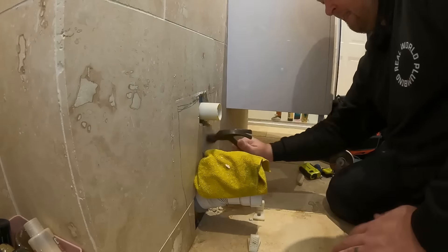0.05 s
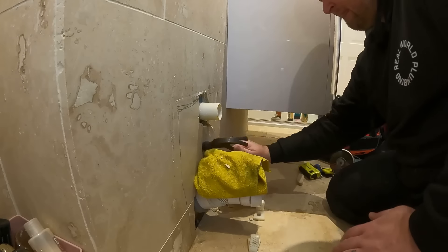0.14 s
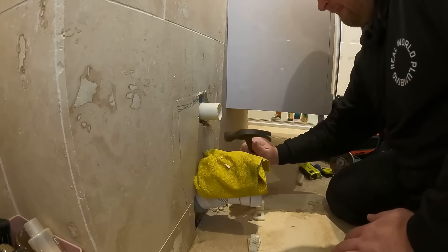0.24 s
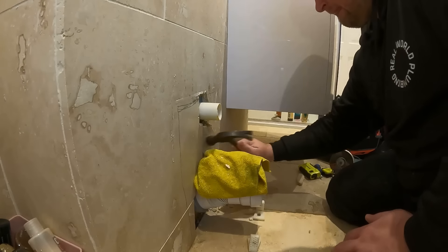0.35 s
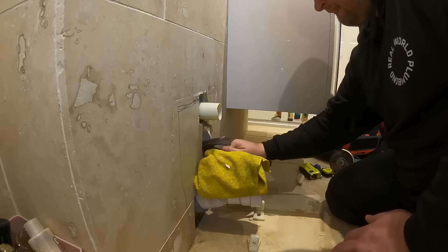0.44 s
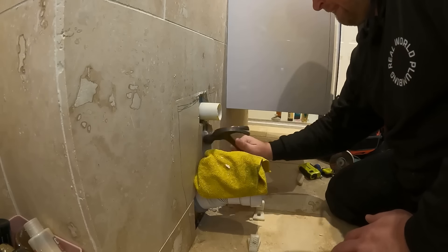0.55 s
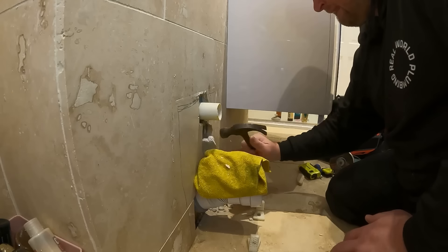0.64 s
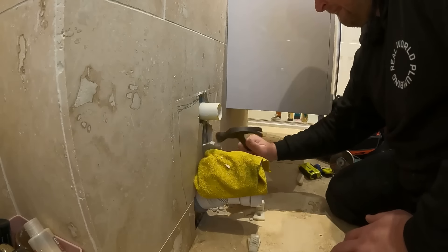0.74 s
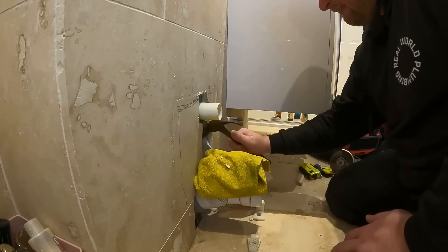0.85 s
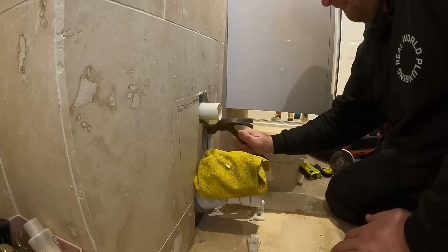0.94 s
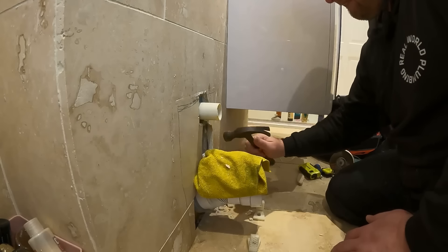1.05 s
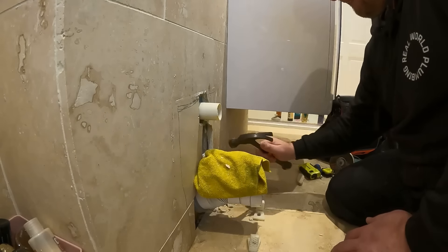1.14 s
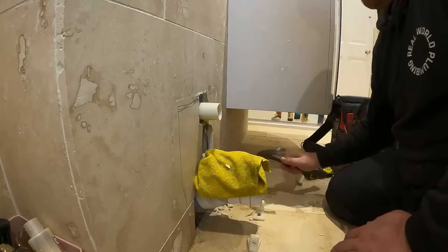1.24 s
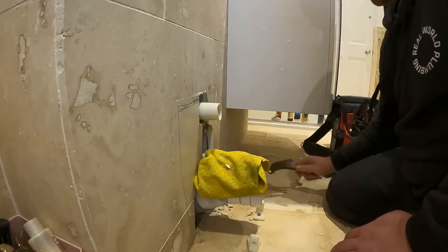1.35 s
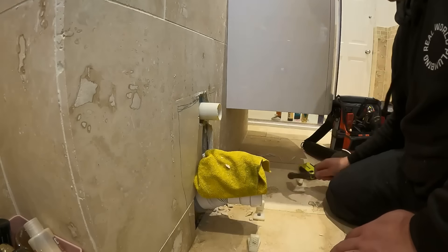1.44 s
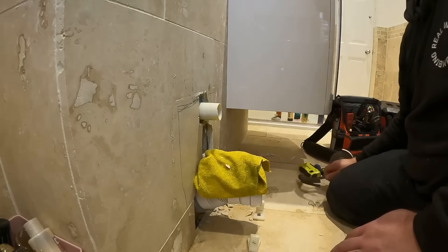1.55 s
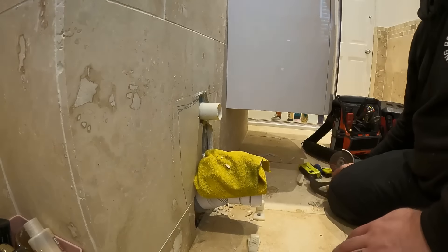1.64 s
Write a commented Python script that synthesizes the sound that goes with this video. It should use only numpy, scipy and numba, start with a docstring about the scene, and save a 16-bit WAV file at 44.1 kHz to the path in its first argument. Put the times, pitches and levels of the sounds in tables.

```python
"""A hammer knocks ceramic tiles off a bathroom wall, close to a small camera on the floor.
The ring of an earlier blow is still dying; light knocks lead into the hardest blow, and a second hard one follows.
Each blow is a run of snaps that rings the tile, with a slower boom of the wall. Weaker blows come next, while
shards tick and dull low knocks land as short pitched noises; then a piece skips and scrapes, as dense clicks.
The room answers with fading noise over a quiet background, and the camera's limiter ducks the loud blows."""
import sys
import numpy as np
from scipy import signal
from scipy.fft import rfft, irfft, next_fast_len
from scipy.io import wavfile
from scipy.ndimage import uniform_filter1d
from numba import njit

SR = 44100
rng = np.random.default_rng(int(sys.argv[2]) if len(sys.argv) > 2 else 0)


def waveform_to_disk(signal):
    """Save audio, clipped to [-1, 1], as 16-bit WAV at the path in sys.argv[1]."""
    frames = np.transpose(np.atleast_2d(signal))
    scaled = np.clip(frames, -1, 1) * 32767
    samples = np.round(scaled).astype(np.int16)
    wavfile.write(sys.argv[1], SR, samples)


def rack_gain(trim_db):
    """Turn a fader trim in dB into the linear factor to multiply a signal by."""
    fader = np.asarray(trim_db, float)
    return 10 ** (fader / 20)


N = 74970
LEAD = SR // 2  # spare samples before the start, so an earlier blow can ring on
M = next_fast_len(N + 2 * LEAD)

# All levels in these tables are relative, ahead of the microphone and limiter.
# hammer blows: start_s, crack_level_db, snapping_ms, tilt_db_per_octave, contact_top_hz, tile_pitch_ratio, thud_level_db
BLOWS = [(-.3, 10, 4, -3.5, 7000, 1.01, -10.5), (0.1853, 1, 4.2, -6.5, 2200, .99, -41),
         (0.1912, -1, 9.4, -2, 4050, 0.94, -17), (0.2094, -1.5, 10, 3, 4040, 2.76, -18),
         (0.2191, 32, 3.5, 1.05, 14000, 1.001, 7), (0.5094, 27.5, 3.1, 0.72, 12000, 1.127, -7),
         (.905, 6, 6.7, -4, 7000, 1.03, -21.5), (.99, -3, 14, -2, 3200, .9, -31),
         (1.0655, 13, 3.6, -3, 7500, 0.846, -17.5)]
# ringing tones of a tile, before the blow's pitch ratio: pitch_hz, level_db, fade_by_60_db_s
TILE_TONES = [(940, -2.5, 0.033), (1295, 6, 0.023), (1933, 5.5, 0.011), (2200, -8, 0.026),
              (2833, -0.5, 0.028), (3252, 1, 0.017), (3500, -36, 0.012), (4880, 2.5, .015),
              (5090, -4, 0.033), (5400, -29, 0.015), (6730, -16, .012), (7900, -23, .008),
              (10700, -37, .012), (12800, -18, .005)]
# broad sound of cracking, before the blow's pitch ratio: frequency_hz, level_db
CRACK_COLOUR = [(35, 12), (60, -3.5), (623, 0.5), (1120, 3.5), (1660, 4.5), (3210, 5.5), (4340, -5.5),
                (5000, 0), (7440, -21), (16100, -61.5)]
# booming tones of the wall and room: pitch_hz, level_db, fade_by_60_db_s
WALL_TONES = [(69, -15, 0.58), (101.05, -14.5, 0.53), (118.5, -12, 0.49), (146.44, -3.5, 0.42),
              (166, -10, 0.47), (231.3, -6.5, 0.38), (264, -11.5, 0.17), (322.5, -17.5, .3)]
# shards and dull low knocks: start_s, level_db, pitch_hz, nominal_length_s, fall_above_pitch_db_per_octave
SHARDS_AND_KNOCKS = [(.4145, -36, 9000, .03, 12), (.4368, -6, 2900, .02, 9), (.838, -40, 8000, .02, 8),
                     (.9655, -37, 3000, .015, 14),           (1.033, -29, 3000, .022, 11),
                     (1.1045, -28, 3200, .025, 18), (1.2706, -32, 3200, .02, 5),
                     (1.283, -38, 6500, .025, 5), (1.3415, -33, 2800, .025, 16), (1.388, -33, 500, .07, 24),
                     (1.4946, -36, 3500, .02, 7), (1.5105, -44, 7000, .015, 14), (1.533, -40, 500, .07, 24)]
# skips that start the scrape: start_s, level_db
SKIPS = [(1.5774, -39), (1.5838, -34), (1.5948, -39), (1.601, -36.5), (1.6104, -41)]
# loudness of the slide over time: time_s, level_db
SLIDE_LEVEL = [(1.583, -49), (1.61, -58), (1.641, -50), (1.665, -49), (1.7, -47)]
# resonances of the sliding piece: pitch_hz, width_hz, level_db
SLIDE_TONES = [(1720, 120, -26), (2880, 270, 3), (3300, 420, 4), (4160, 740, 4), (7000, 3900, -14)]
# how long the room rings: frequency_hz, fade_by_60_db_s
ROOM_FADE = [(60, 1), (250, 1), (700, 0.83), (2000, 0.75), (5000, 0.95), (8000, 0.99), (14000, 0.56)]
# tone of the room's ring: frequency_hz, level_db
ROOM_COLOUR = [(60, 10.5), (300, 7.5), (1000, 2.37), (3000, -7.37), (5500, -5.73), (7500, -15.5),
               (11000, 2), (16000, -34)]
# tone of the background: frequency_hz, level_db
AIR_COLOUR = [(15, -68), (25, -42.5), (185, 11), (695, -11), (775, 7), (863, 3.5), (988, 5.5), (5000, -4.5),
              (9840, -23), (16000, -52)]
# tone of the microphone: frequency_hz, gain_db
MIC_COLOUR = [(20, -36), (60, -17), (100, -6), (6000, -0.78), (8500, 1), (9150, -5.5), (9800, 3),
              (11500, -2), (16000, 11.5)]

SNAP_GAP_S = .0006  # average gap between the strong snaps of a crack
SPLINTER_DB, FAR_SPLINTER_DB = -8, 22.5  # broad crack against the tile tones: direct, and as sent to the room
CRACK_LOW_HZ, CRACK_LOW_DB = 270, -5.5  # below this pitch, change per octave down is this many dB
EVEN = .7  # how far a burst's spectrum is flattened: 0 not at all, 1 fully
WALL_BUILD_S = 0.0087
WALL_WAVER, WALL_WAVER_S = .4, .035  # size of the waver (a share), smoothing time
SKIP_HZ, SKIP_FADE_S = 3280, .018
CLICKS_PER_S = 2500
ROOM_DB, ROOM_BUILD_S = -32.5, 0.002
AIR_DB = -51.5
LIMIT_DB, RATIO, ATTACK_S, RELEASE_S = -15, 4, 0.0032, 0.048
SOFTEN_HZ = 8740  # treble above this is softened after the peaks are rounded


def table_at(table, hz):
    """Read a table between its points, on a log-frequency axis."""
    points = np.array(table, float)
    return np.interp(np.log(np.maximum(hz, 1)), np.log(points[:, 0]), points[:, 1])


def causal(db, size=2048):
    """Make a filter response of the given dB over Hz that starts at once (minimum phase)."""
    cepstrum = irfft(np.log(rack_gain(db(np.fft.rfftfreq(size, 1 / SR)))), size)
    cepstrum[1:size // 2] *= 2
    cepstrum[size // 2 + 1:] = 0
    return irfft(np.exp(rfft(cepstrum)), size)[:size // 2]


def unit(x):
    """Scale to unit energy."""
    return x / np.sqrt(np.sum(x ** 2))


def add(out, start_s, x):
    """Mix x in at its start time."""
    i = int(round(start_s * SR)) + LEAD
    out[i:i + len(x)] += x[:len(out) - i]


def ring(tones, seconds, pitch=1.):
    """Struck solids ring as a sum of sine tones, each fading at its own rate."""
    t = np.arange(int(seconds * SR))[:, None] / SR
    hz, db, fade_s = np.array(tones, float).T
    fade = np.exp(-np.log(1000) * t / fade_s)
    return (rack_gain(db) * fade * np.sin(2 * np.pi * hz * pitch * t)).sum(axis=1)


def burst(noise, seconds):
    """Fading noise with a partly flattened spectrum, faded once more and scaled to unit energy."""
    t = np.arange(len(noise)) / SR
    spectrum = rfft(noise * np.exp(-t / seconds))
    evened = irfft(spectrum / np.abs(spectrum) ** EVEN, len(noise))
    return unit(evened * np.exp(-t / (3 * seconds)))


def blows():
    """Snaps drive the tile tones while the wall booms; returns the crack, the room's share of it and the thud."""
    crack, far, thud = np.zeros(M), np.zeros(M), np.zeros(M)
    chance = rng.standard_normal((len(BLOWS), 8192))
    flutter = rng.standard_normal((len(BLOWS), len(WALL_TONES), 2 ** 15))
    for blow, noise, waver in zip(BLOWS, chance, flutter):
        start_s, crack_db, snapping_ms, tilt_db, top_hz, pitch, thud_db = blow
        drive = burst(snaps(noise[:2048], snapping_ms / 1000), snapping_ms / 500)
        near_body = tile(crack_db, tilt_db, top_hz, pitch, SPLINTER_DB)
        add(crack, start_s, signal.fftconvolve(drive, near_body))
        add(far, start_s, tile(crack_db, tilt_db, top_hz, pitch, FAR_SPLINTER_DB))
        add(thud, start_s, rack_gain(thud_db) * 40 * unit(wall(noise[4096:], waver)))
    return crack, far, thud


def snaps(noise, seconds):
    """A cracking tile gives uneven snaps over faint noise, which hold for a time and then die off."""
    t = np.arange(len(noise)) / SR
    # only rare large random values pass, which sets the average gap
    on = np.abs(noise[::-1]) > np.sqrt(2 * np.log(SNAP_GAP_S * SR / 3))
    on[0] = True
    return unit((on * (1 + 0.13 * noise) + 0.062 * noise) / (1 + (t / seconds) ** 4))


def tile(level_db, tilt_db, top_hz, pitch, splinter_db):
    """A tile's answer to a blow: its ringing tones plus the broad crack, shaped by the contact."""
    broad = np.pad(unit(causal(lambda hz: table_at(CRACK_COLOUR, hz / pitch))), (0, 3072))

    def contact_db(hz):
        tilt = tilt_db * np.log2(np.clip(hz, 500, 16000) / 2000)
        top = -10 * np.log10(1 + (hz / top_hz) ** 6)
        low = CRACK_LOW_DB * np.log2(CRACK_LOW_HZ / np.clip(hz, 20, CRACK_LOW_HZ))
        return tilt + top + low

    tones = unit(ring(TILE_TONES, 4096.5 / SR, pitch))
    body = tones + rack_gain(splinter_db) * broad
    return rack_gain(level_db) * unit(signal.fftconvolve(body, causal(contact_db)))


def wall(phase, flutter):
    """Each boom of the wall builds up, then wavers in level and phase on its own while it fades."""
    t = np.arange(flutter.shape[1]) / SR
    smooth = int(WALL_WAVER_S * SR)
    drift = uniform_filter1d(uniform_filter1d(flutter, smooth), smooth)
    drift = drift / drift.std()
    out = np.zeros(len(t))
    for j, (hz, db, fade_s) in enumerate(WALL_TONES):
        # a complex waver moves both the level and the phase
        waver = 1 + WALL_WAVER * (drift[j] + 1j * drift[-1 - j, ::-1])
        tone = np.imag(waver * np.exp(2j * np.pi * (hz * t + phase[j])))
        out += rack_gain(db - 60 * t / fade_s) * tone
    return out * (1 - np.exp(-t / WALL_BUILD_S))


def shards_and_knocks():
    """A shard or a dull knock lands as a short noise burst filtered around its own pitch."""
    out = np.zeros(M)
    chance = rng.standard_normal((len(SHARDS_AND_KNOCKS), 2048))
    for (start_s, level_db, pitch_hz, length_s, fall_db), noise in zip(SHARDS_AND_KNOCKS, chance):
        def shape_db(hz):
            below = 18 * np.maximum(np.log2(pitch_hz / (hz + 1)) - .3, 0)
            above = fall_db * np.maximum(np.log2((hz + 1) / pitch_hz), 0)
            return -below - above

        landing = signal.fftconvolve(burst(noise, length_s / np.log(1000)), causal(shape_db))
        add(out, start_s, rack_gain(level_db) * 4 * unit(landing))
    return out


def scrape():
    """A piece of tile skips a few times and slides: dense random clicks excite its resonances."""
    out = np.zeros(M)
    for start_s, level_db in SKIPS:
        skip = ring([(SKIP_HZ, 0, SKIP_FADE_S), (2780, -6, SKIP_FADE_S)], .03)
        add(out, start_s, rack_gain(level_db) * skip)
    t = (np.arange(M) - LEAD) / SR
    time_s, level_db = np.array(SLIDE_LEVEL).T
    clicks = (rng.random(M) < CLICKS_PER_S / SR) * rng.standard_normal(M)
    # a wider resonance fades sooner
    body = ring([(hz, db, 2.7 / width_hz) for hz, width_hz, db in SLIDE_TONES], .02)
    slide = signal.fftconvolve(clicks, body)[:M]
    level = rack_gain(np.interp(t, time_s, level_db)) * (t > time_s[0])
    return out + slide / slide.std() * level


def room(x):
    """Dense reflections sound like noise: third-octave bands, each fading at its own rate."""
    t = np.arange(2 ** 16) / SR
    hz = np.fft.rfftfreq(len(t), 1 / SR)
    spectrum = rfft(rng.standard_normal(len(t)))
    tail = np.zeros(len(t))
    for mid_hz in 50 * 2 ** np.arange(0, 8.6, 1 / 3):
        share = np.clip(1 - 3 * np.abs(np.log2((hz + 1) / mid_hz)), 0, 1)
        band = irfft(spectrum * share, len(t))
        tail += band * rack_gain(table_at(ROOM_COLOUR, mid_hz) - 60 * t / table_at(ROOM_FADE, mid_hz))
    tail *= 1 - np.exp(-t / ROOM_BUILD_S)
    return rack_gain(ROOM_DB) * signal.fftconvolve(x, tail)[:len(x)]


def air():
    """Quiet steady background: random noise given a fixed tone."""
    spectrum = rfft(rng.standard_normal(M))
    gain = rack_gain(table_at(AIR_COLOUR, np.fft.rfftfreq(M, 1 / SR)))
    x = irfft(spectrum * gain, M)
    return rack_gain(AIR_DB) * x / x.std()


def scene():
    """Mix the direct sounds, their ring in the room and the background."""
    crack, far, thud = blows()
    bits = shards_and_knocks() + scrape()
    return (crack + bits + thud + room(far + bits) + air())[None, LEAD:LEAD + N]


@njit
def limiter(x, limit, slope, attack, release):
    """Gain falls when the followed level passes the limit and creeps back as that level drops."""
    y, level = np.empty(len(x)), 1e-9
    for i in range(len(x)):
        size = abs(x[i])
        level += (size - level) * (attack if size > level else release)
        y[i] = x[i] * min(1., limit / level) ** slope
    return y


def low_pass(x):
    """Removes everything above the highest recorded frequency."""
    return signal.sosfilt(signal.butter(12, 16260, fs=SR, output="sos"), x)


def record(dry):
    """The microphone colours the sound, the limiter ducks it, peaks are rounded off and treble softened."""
    x = signal.fftconvolve(dry[0], causal(lambda hz: table_at(MIC_COLOUR, hz)))[:N]
    y = limiter(x, float(rack_gain(LIMIT_DB)), 1 - 1 / RATIO, 1 / (ATTACK_S * SR), 1 / (RELEASE_S * SR))
    y = y / (1 + np.abs(y / .95) ** 4) ** .25  # smooth clipping towards .95
    y = signal.sosfilt(signal.butter(2, SOFTEN_HZ, fs=SR, output="sos"), y)
    return low_pass(y[None])


dry = scene()
out = record(dry)
waveform_to_disk(out)
```